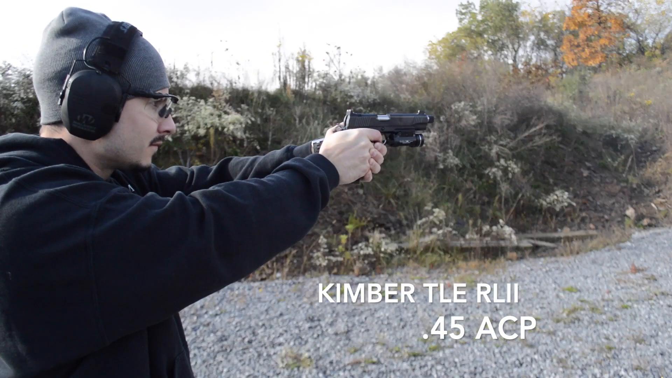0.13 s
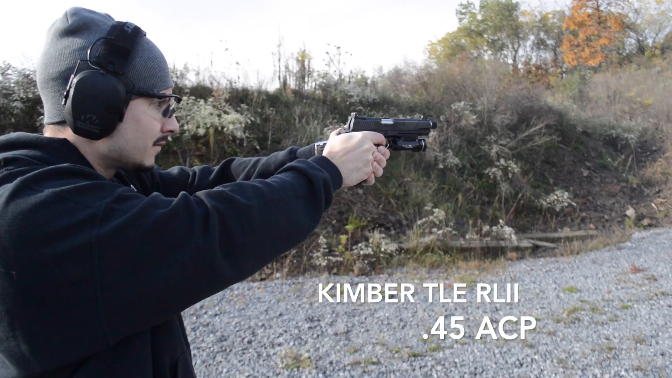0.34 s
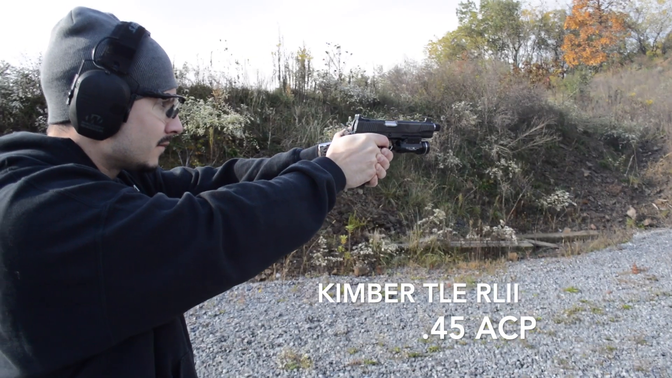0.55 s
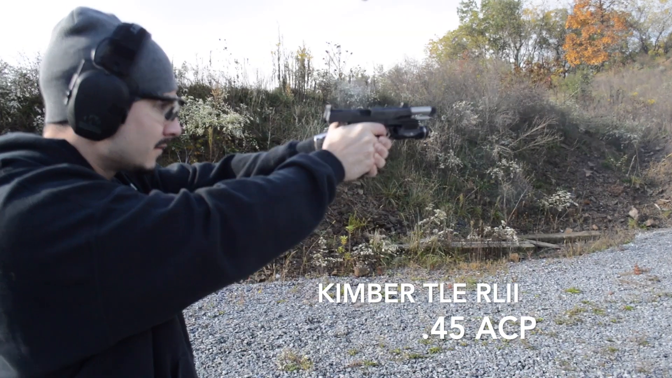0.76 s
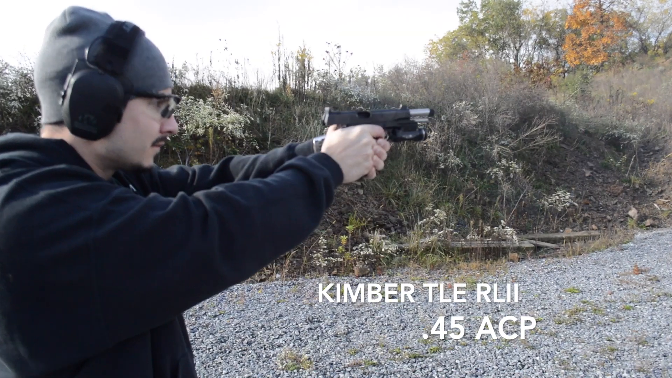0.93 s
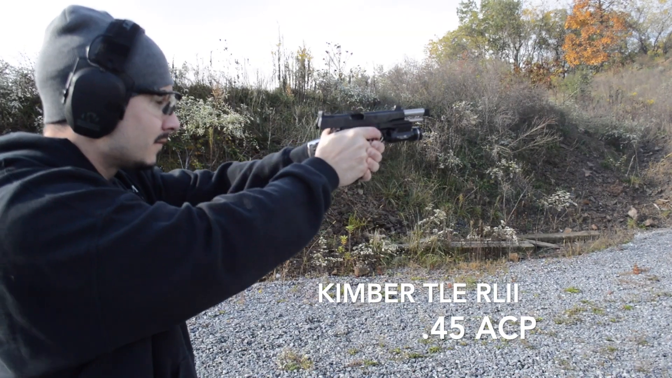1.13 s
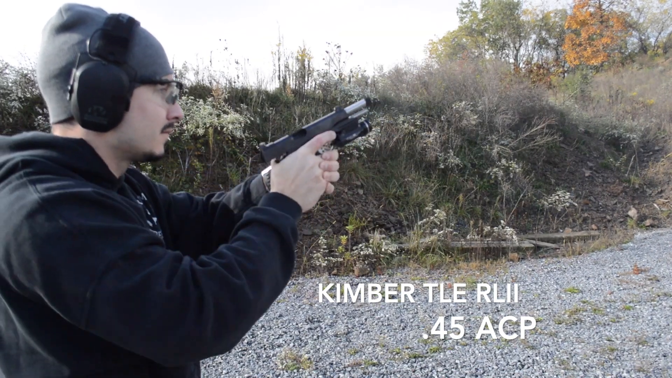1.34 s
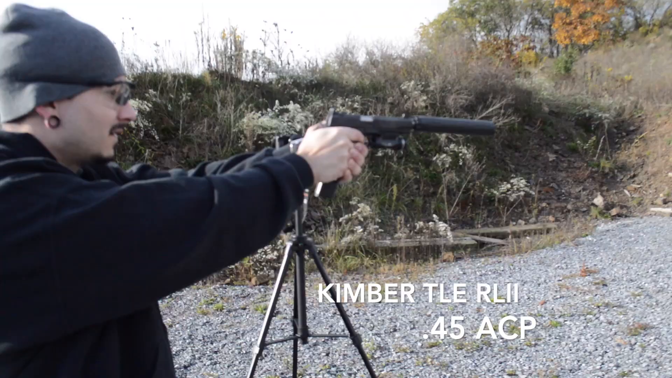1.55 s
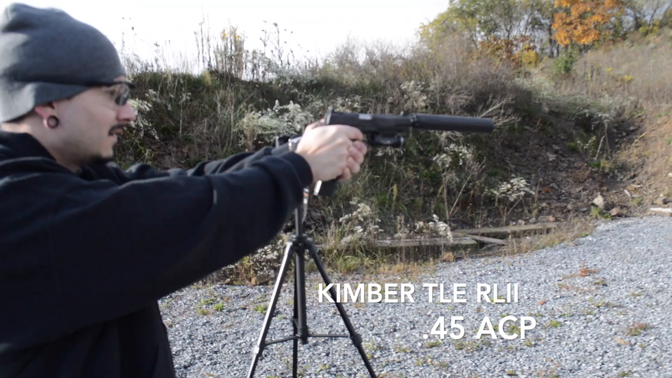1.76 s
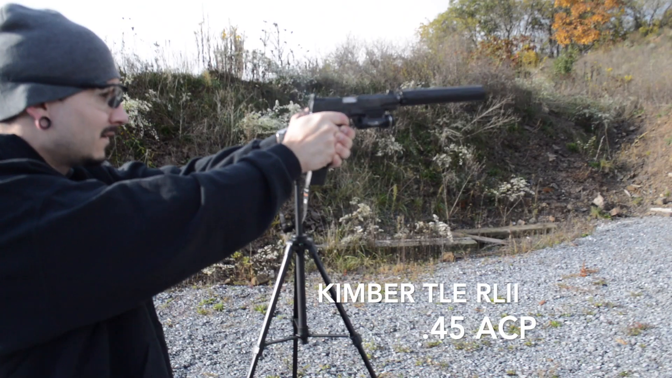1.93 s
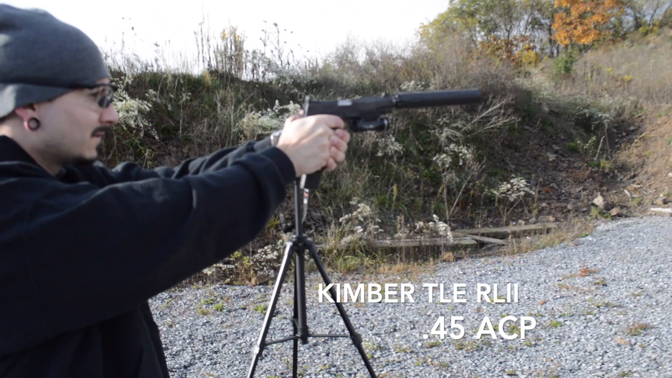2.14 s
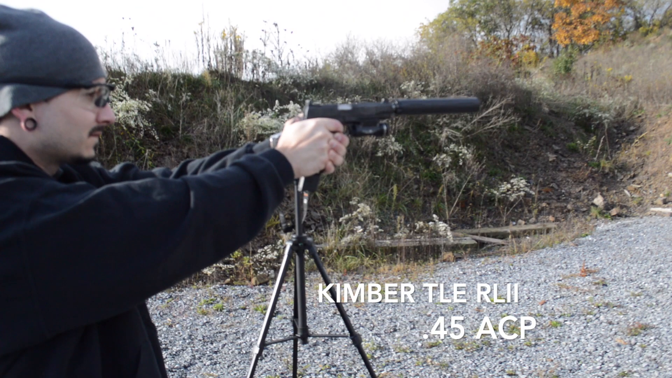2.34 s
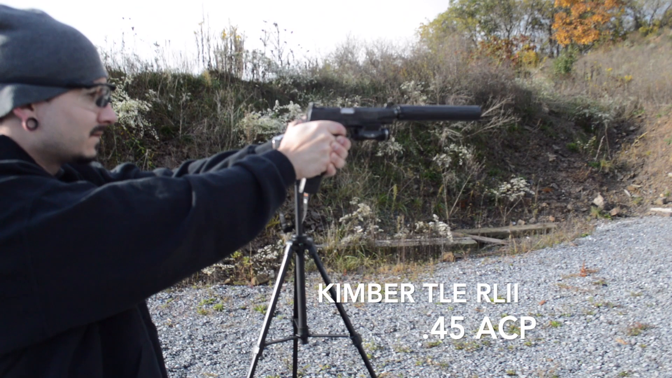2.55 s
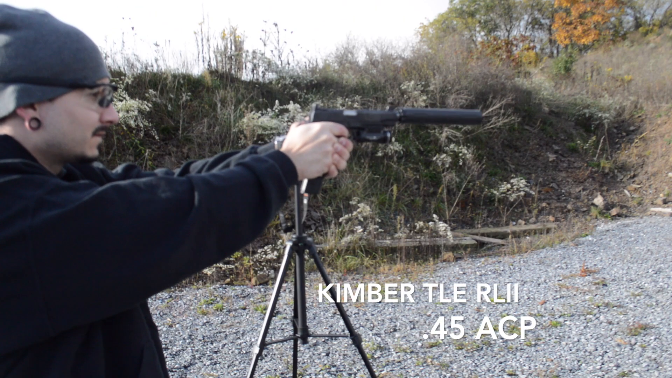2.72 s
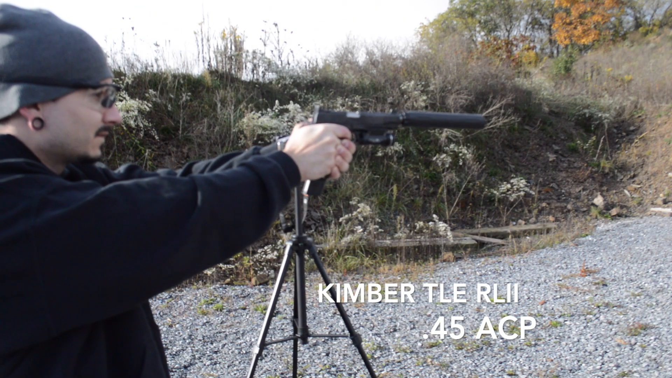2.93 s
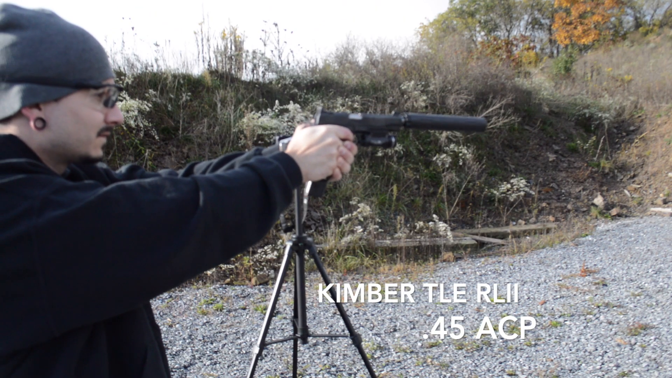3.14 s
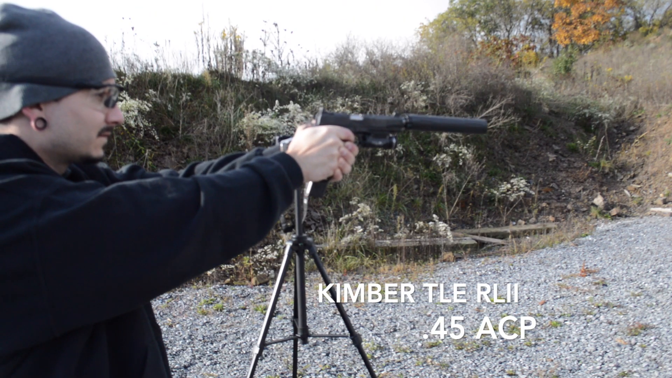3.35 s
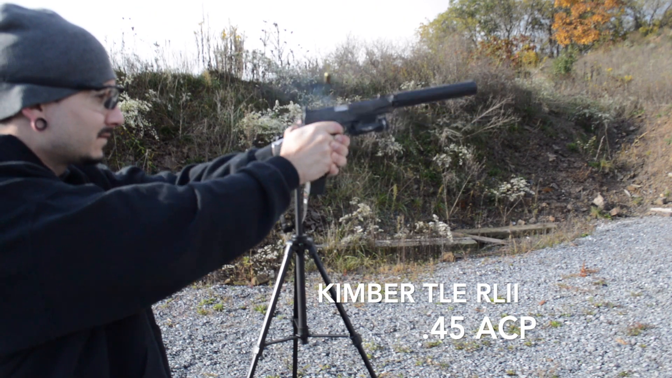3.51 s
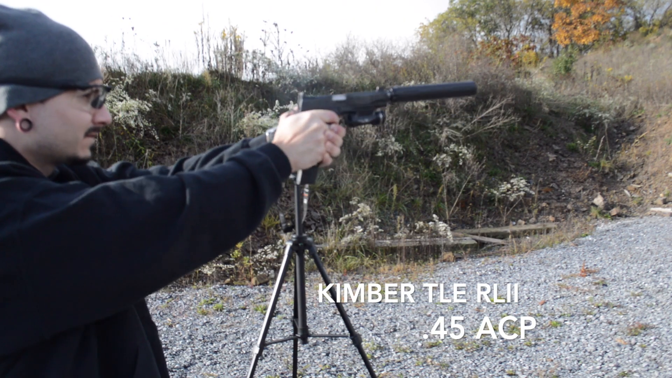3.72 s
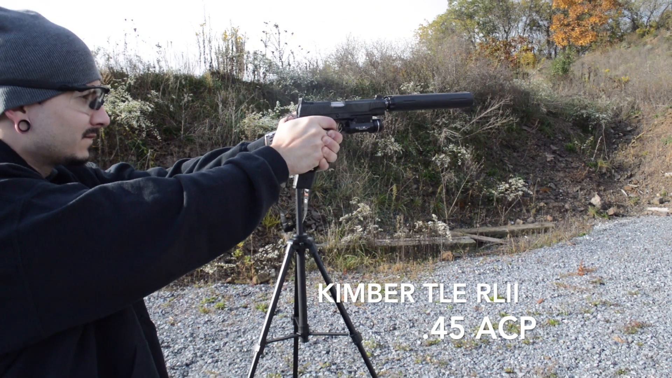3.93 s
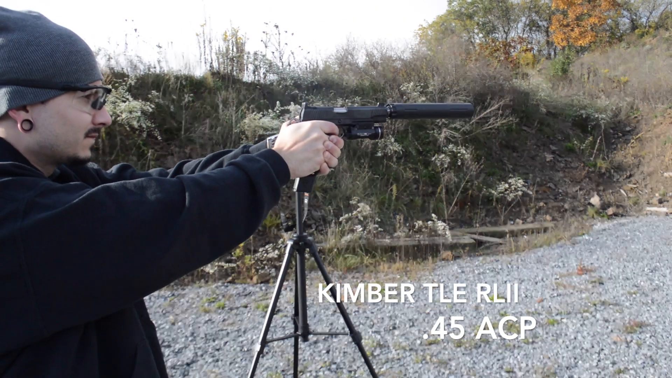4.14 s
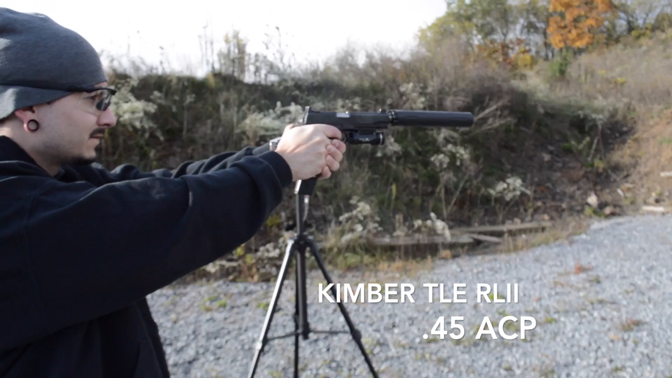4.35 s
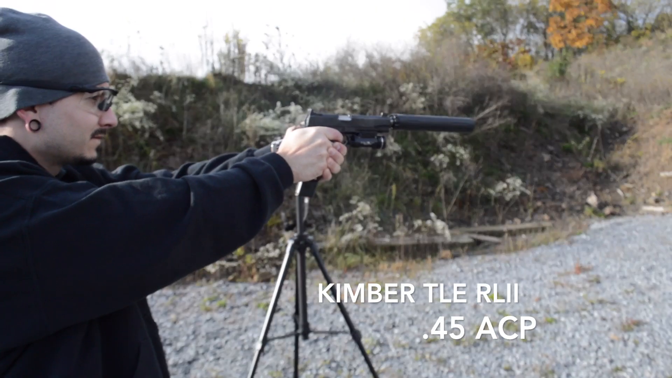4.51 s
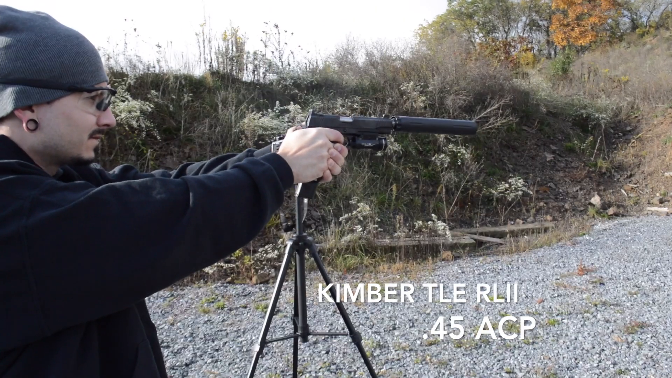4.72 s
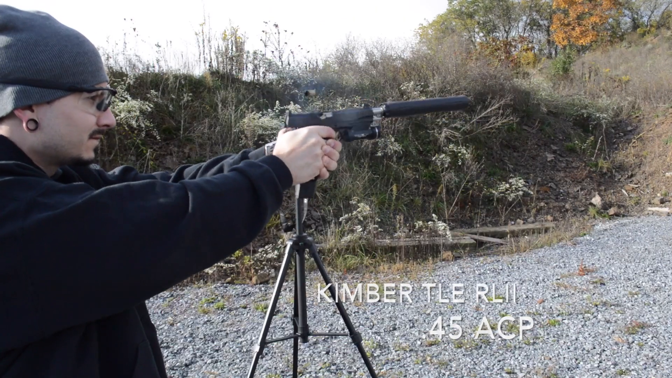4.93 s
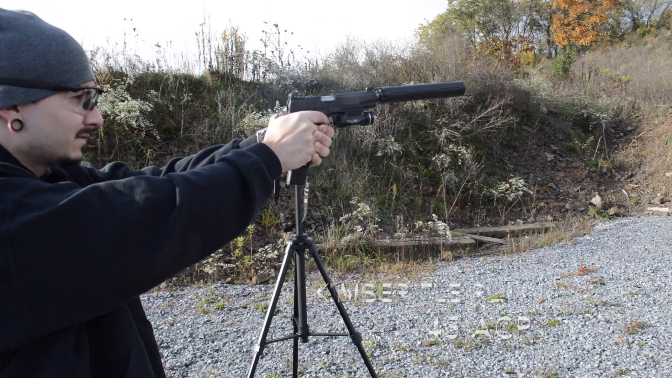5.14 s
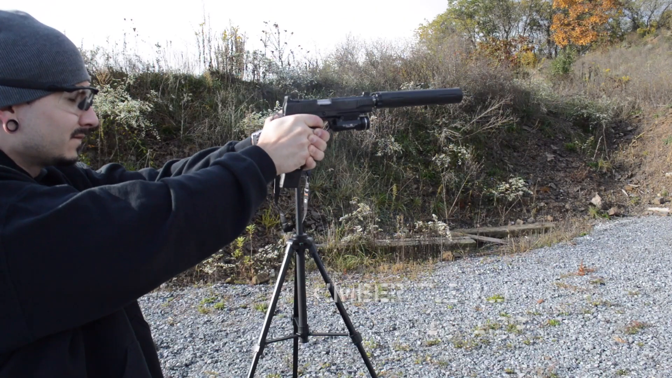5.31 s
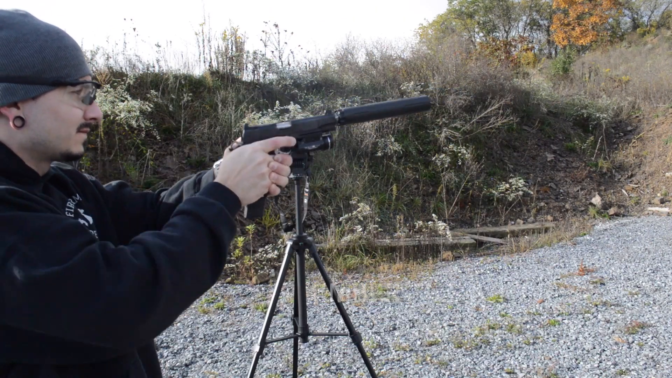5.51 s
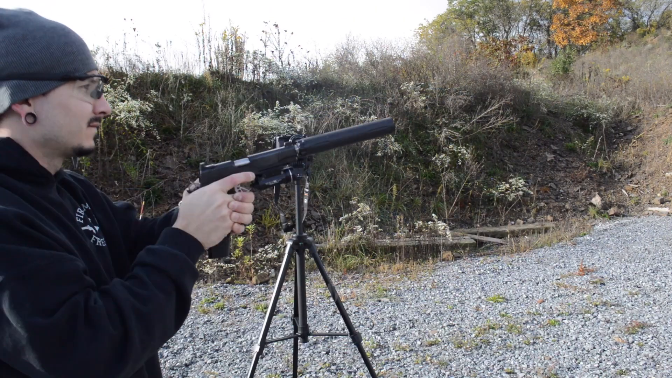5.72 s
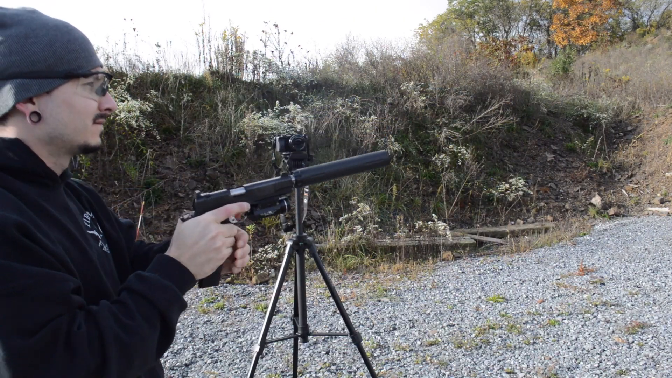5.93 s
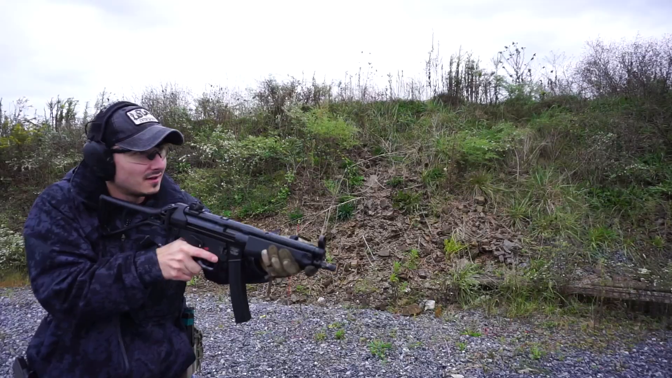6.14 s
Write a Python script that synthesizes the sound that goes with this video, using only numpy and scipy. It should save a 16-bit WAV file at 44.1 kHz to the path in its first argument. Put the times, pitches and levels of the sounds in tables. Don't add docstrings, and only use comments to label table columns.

```python
import sys
import numpy as np
from scipy import signal
from scipy.fft import rfft, irfft, next_fast_len
from scipy.io import wavfile
from scipy.ndimage import uniform_filter1d

SR = 44100
rng = np.random.default_rng(int(sys.argv[2]) if len(sys.argv) > 2 else 0)


def int16_out(signal):
    q = np.round(np.clip(np.atleast_2d(signal).T, -1, 1) * 32767)
    wavfile.write(sys.argv[1], SR, q.astype(np.int16))


def voltage_ratio(decibels):
    exponent = np.asarray(decibels, float) / 20
    return 10 ** exponent


N = 272097

LEAD_S = 0.005
SHOT_T = np.arange(SR) / SR - LEAD_S
GRIT_DB = 3


def colour(x, table):
    hz, db = np.transpose(table)
    f = np.log(np.fft.rfftfreq(len(x), 1 / SR) + 1)
    y = irfft(rfft(x) * voltage_ratio(np.interp(f, np.log(hz), db)), len(x))
    return y / np.sqrt(np.mean(y ** 2))


def bands(x, centres_hz):
    f = np.log(np.fft.rfftfreq(len(x), 1 / SR) + 1)
    centres = np.log(centres_hz)
    spectrum = rfft(x)
    return [irfft(spectrum * np.interp(f, centres, row), len(x)) for row in np.eye(len(centres))]


def add(out, start_s, x):
    i = int(round(start_s * SR))
    a, b = max(i, 0), min(i + len(x), N)
    out[a:b] += x[a - i:b - i]


def walk(rate_hz, size=N):
    hold = int(SR / rate_hz)
    steps = np.repeat(rng.standard_normal(size // hold + 1), hold)
    return 1.41 * uniform_filter1d(steps, hold)[:size]


def gas_blast(spectrum, level_db, hold_s, fall_s, hammer_db):
    hammer = voltage_ratio(hammer_db + 670 * np.minimum(SHOT_T, 0))
    burst = np.exp(-np.maximum(SHOT_T - hold_s, 0) / fall_s)
    gas = colour(rng.standard_normal(SR), spectrum)
    return voltage_ratio(level_db + GRIT_DB * walk(392, SR)) * gas * np.where(SHOT_T < 0, hammer, burst)


def bank_return(ground, banks, body_db, far_air, spectrum, bounce_s, bounce):
    coarse_s = np.arange(0, 1, .001)
    crest_s, level_db, rise, fall, bass_db = np.transpose(banks)[:, :, None]
    waves_db = level_db - np.maximum(rise * (crest_s - coarse_s), fall * (coarse_s - crest_s))
    near_db, far_db, fade_s = far_air
    treble_db = far_db + (near_db - far_db) * np.exp(-coarse_s / fade_s)

    alike = 0.49
    echo = alike * ground + np.sqrt(1 - alike ** 2) * rng.standard_normal(SR)
    skim = bounce * (SHOT_T > .36) * np.roll(echo, int(bounce_s * SR))
    echo = colour(echo + skim, spectrum)

    lumps_db = 4.5 * SHOT_T * walk(80.1, SR)
    out = np.zeros(SR)
    centres_hz = 150 * 2 ** np.arange(0, 7, .75)
    for hz, band in zip(centres_hz, bands(echo, centres_hz)):
        bass = (bass_db + body_db * (crest_s > .15)) * np.clip(np.log2(1800 / hz), 0, 1)
        waves = np.sqrt(np.sum(voltage_ratio(waves_db + bass) ** 2, axis=0))
        waves = waves * voltage_ratio(treble_db * max(hz - 3000, 0) / 8000)
        patchy_db = 1.85 * walk(89.12, SR) + 1.27 * walk(25.4, SR)
        level = voltage_ratio(3.5 + patchy_db + lumps_db * (hz < 1500))
        out += (SHOT_T > 0) * band * np.interp(SHOT_T, coarse_s, waves) * level
    return out


def knock(level_db, pitch_hz, cycles):
    u = np.arange(1024) * pitch_hz / cycles / SR
    noise = rng.standard_normal(1024)
    rattle = bands(noise, [pitch_hz / 3, pitch_hz, pitch_hz * 3])[1] * 0.78 * np.exp(-u / 3.4)
    swell = np.sin(np.pi * np.minimum(u, 1) ** 0.46) ** 2
    return voltage_ratio(level_db) * (swell * np.sin(2 * np.pi * cycles * u) + rattle)


def shots(times, blast, blast_db, fall_s, knocks, banks, far_air, echo_colour, bounce_s, bounce):
    out = np.zeros(N)
    ground = rng.standard_normal(SR)
    for start_s, level_db, body_db, hold_s, hammer_db in times:
        x = gas_blast(blast, blast_db, hold_s, fall_s, hammer_db)
        x += bank_return(ground, banks, body_db, far_air, echo_colour, bounce_s, bounce)
        for delay_s, peak_db, pitch_hz, cycles in knocks:
            i = int((delay_s + LEAD_S) * SR)
            x[i:i + 1024] += knock(peak_db, pitch_hz, cycles)
        add(out, start_s - LEAD_S, voltage_ratio(level_db) * x)
    return out


# start_s, level_db, return_bass_db, blast_hold_s, hammer_db (under the blast)
OPEN_SHOTS = [
    (-.281, -1.1, 1.7, .012, -20),
    (0.6808, 0, 0, 0.013, -18),
]
# pitch_hz, level_db (per Hz)
OPEN_BLAST = [(35, -32), (60, -8), (1080, 4), (2140, -5.5), (2460, 8.5), (2770, -5), (6300, 0.5),
              (15400, -5.5), (16500, -30.5)]
# delay_s, peak_db, pitch_hz, cycles
OPEN_KNOCKS = [
    (.001, -9.5, 165.5, 2.2),
    (.0537, 3, 814, 3.6),
    (.0545, 7, 2830, 1.4),
    (.065, -18, 6460, 5.5),
    (.205, -10, 650, 1.8),
    (.26, -4, 720, 3),
    (.442, -10, 494, 5.3),
    (.494, -15, 566, 8.7),
]
# crest_s (after the shot), level_db, rise_db_per_s, fall_db_per_s, extra_bass_db
OPEN_BANKS = [
    (.0, -20.5, 900, 122.5, -36.5),
    (0.063, -26, 252, 378, 9.5),
    (0.206, -31, 400, 67, -20),
    (0.258, -17.5, 151.5, 317, 1),
    (0.322, -26.5, 47, 652, 1.5),
    (.37, -40, 150, 67, -23.5),
    (0.418, -24, 752, 75.5, 3),
]
# at_once_db, far_away_db, fade_s
OPEN_AIR = (11.8, -23.5, 0.59)
# pitch_hz, level_db (per Hz)
OPEN_COLOUR = [(59, -51), (100, -13), (283, -20.5), (535, -2), (662, -5), (854, -5), (1310, -4.5),
               (1450, -8.5), (2130, -8), (6700, -13.5), (16000, -26.5)]


def open_shots():
    return shots(OPEN_SHOTS, OPEN_BLAST, -7.5, 0.005, OPEN_KNOCKS, OPEN_BANKS, OPEN_AIR, OPEN_COLOUR,
                 bounce_s=0.0019, bounce=0.013)


# start_s, level_db, return_bass_db, blast_hold_s, hammer_db (under the blast)
QUIET_SHOTS = [
    (1.82, 0.084, 0.5, 0.0052, -20.5),
    (3.4815, 0.086, -5, 0.0041, -16),
    (4.9327, 0.1, -4.5, 0.0062, -20),
]
# pitch_hz, level_db (per Hz)
QUIET_BLAST = [(35, -54), (60, -18), (342, 2), (2770, -10.5), (3180, -5.5), (7960, -0.5), (8960, -4.5),
               (15000, 0.5), (16500, -1)]
# delay_s, peak_db, pitch_hz, cycles
QUIET_KNOCKS = [
    (0.003, -21.5, 125, 0.56),
    (.046, 5, 1660, 1),
    (0.0454, 7.5, 4500, 1.6),
    (0.0536, -4.5, 1940, 1.5),
    (0.0534, -1, 7330, 3.2),
    (.2373, -6, 2340, 4.5),
    (.237, -16, 5480, 9.5),
    (.255, -24, 848, 12.5),
    (.4, -37, 1800, 5.2),
]
# crest_s (after the shot), level_db, rise_db_per_s, fall_db_per_s, extra_bass_db
QUIET_BANKS = [
    (.0, -32, 900, 71.4, -27),
    (0.064, -35.5, 900, 268, 9),
    (0.188, -45.5, 840, 33.8, -7),
    (0.258, -25.5, 158, 243, 0),
    (0.323, -35, 15, 850, -7.5),
    (.37, -88.5, 150, 50, -58),
    (0.413, -33.5, 460, 87.5, 6.5),
]
# at_once_db, far_away_db, fade_s
QUIET_AIR = (18.3, -12.5, 0.31)
# pitch_hz, level_db (per Hz)
QUIET_COLOUR = [(59, -66), (100, -50.5), (138, -6), (260, -18.5), (358, -14), (535, -7.5), (800, -10),
                (1050, -13.5), (1500, -6), (2420, -5), (4000, -7), (5600, -7.5), (6350, -7.5),
                (7200, -10.5), (8500, -12.5), (16000, -28.5)]


def suppressed_shots():
    return shots(QUIET_SHOTS, QUIET_BLAST, -0.69, .0062, QUIET_KNOCKS, QUIET_BANKS, QUIET_AIR, QUIET_COLOUR,
                 bounce_s=.00064, bounce=.38)


# start_s, level_5khz_db, level_2500hz_db, level_10khz_db,
# level_14khz_db
CONTACTS = [(0.0731, -14, -15, -16, -6), (0.0739, -9, -8, -20, -21), (0.0791, -17, -12, -30, -33),
            (0.0867, -13, -14, -6, -15), (0.3736, -16, -20, -13, -13), (0.3744, -18, -26, -25, -19),
            (0.5173, -14, -22, -4, -3), (0.5188, -20, -15, -18, -7), (1.1412, -17, -22, -17, -24),
            (1.1424, -14, -24, -21, -17), (1.2552, -36, -36, -27, -35), (1.2865, -20, -22, -21, -23),
            (1.2872, -23, -23, -25, -23), (1.5361, -18, -21, -13, -11), (1.5368, -14, -12, -15, -13),
            (1.5388, -15, -11, -17, -19), (1.5403, -13, -20, -5, -24),
            (2.5759, -16, -22, -17, -9), (2.5773, -24, -30, -26, -18), (2.634, -12, -19, -9, -24),
            (2.6348, -8, -19, -12, -13), (2.6356, -12, -21, -5, -9), (2.6521, -33, -45, -30, -25),
            (2.6534, -27, -45, -27, -23), (2.6548, -37, -48, -25, -32), (2.718, -19, -39, -23, -32),
            (2.7408, -33, -29, -27, -24), (2.8137, -23, -37, -18, -27), (2.8324, -14, -22, -12, -28),
            (2.8426, -25, -37, -19, -30), (3.2029, -25, -29, -44, -43), (3.2539, -41, -53, -33, -19),
            (3.8368, -31, -41, -27, -33), (3.8765, -33, -32, -28, -19), (4.2742, -13, -22, -16, -10),
            (4.2981, -12, -20, -13, -14), (4.2989, -17, -28, -18, -24), (4.2996, -22, -22, -26, -19),
            (4.3009, -22, -30, -13, -15), (4.3023, -14, -19, -13, -17), (4.3031, -20, -25, -18, -19),
            (4.5869, -5, -14, -21, -19), (4.6831, -39, -37, -21, -35), (4.7291, -18, -26, -25, -23),
            (4.7537, -15, -33, -17, -24), (4.8059, -22, -34, -39, -41), (5.3985, -16, -23, -12, -19),
            (5.3996, -13, -27, -21, -18), (5.4009, -16, -28, -32, -20), (5.4039, -21, -27, -36, -24),
            (5.7578, -16, -16, -10, -15), (5.7595, -10, -21, -3, -11), (5.7621, -8, -17, -6, -4),
            (2.6213, -37, -46, -37, -45), (2.6898, -46, -50, -32, -42), (2.6939, -34, -49, -32, -39),
        (2.7354, -32, -46, -28, -43), (2.7646, -40, -52, -32, -39), (2.7654, -36, -53, -46, -38),
        (2.7756, -30, -39, -29, -37), (2.7954, -30, -46, -32, -34), (2.9229, -45, -48, -37, -47),
        (2.9265, -36, -48, -37, -45), (2.9308, -32, -45, -33, -48), (2.9616, -48, -48, -44, -37),
        (3.0907, -50, -48, -37, -37), (3.2021, -29, -41, -43, -38), (3.3721, -41, -47, -36, -34),
        (4.1654, -38, -46, -45, -37), (4.3378, -31, -43, -29, -33), (4.342, -41, -49, -33, -37),
        (4.4107, -42, -49, -31, -35), (4.4285, -36, -40, -42, -41), (4.4448, -40, -50, -38, -41),
        (4.4542, -43, -47, -45, -38), (4.4743, -34, -47, -32, -32), (4.5214, -50, -40, -52, -52),
        (4.7875, -40, -41, -37, -35), (4.8132, -35, -38, -44, -41), (4.8302, -30, -41, -45, -37),
        (4.8446, -33, -42, -31, -41), (4.8632, -37, -51, -31, -37), (5.4955, -39, -43, -40, -37),
        (5.7962, -33, -43, -30, -28), (5.8099, -37, -46, -38, -32), (5.8478, -43, -54, -37, -44),
        (5.8839, -46, -53, -35, -47), (5.8929, -36, -53, -35, -42), (5.8959, -45, -49, -37, -45),
        (5.901, -43, -51, -35, -42), (5.9046, -39, -41, -37, -51), (5.935, -40, -38, -48, -44),
        (6.1171, -54, -37, -48, -50)]


def case_clicks():
    out, n = np.zeros(N), 512
    f = np.log(np.fft.rfftfreq(n, 1 / SR) + 30)
    points = np.log([200, 800, 1700, 3300, 4500, 6500, 9000, 11000, 13000])
    for start_s, mid, low, high, top in CONTACTS:
        ripple = rng.standard_normal(24)
        db = np.interp(f, points, [low - 14, low - 4, low, low, mid, mid, high, high, top])
        db += 17 + 1.5 * np.interp(np.arange(len(f)), np.linspace(0, len(f), len(ripple)), ripple)
        cepstrum = irfft(np.log(voltage_ratio(db)), n)
        cepstrum[1:n // 2] *= 2
        cepstrum[n // 2 + 1:] = 0
        add(out, start_s - .0001, irfft(np.exp(rfft(cepstrum)), n) * np.sign(ripple[0]))
    return out


# start_s, level_db, tilt_db (per octave)
SKIDS = [(.074, -13, -4), (0.086, -22, -4), (.374, -22, -2), (.518, -16, 2), (1.142, -20, 0),
         (1.287, -21, 4), (1.5385, -17.5, -3), (2.576, -18.5, 1.5), (2.636, -12, 4.5), (2.652, -39, 9),
         (2.718, -36, 4), (2.831, -24, 6.5), (3.203, -33.5, -3.5), (3.523, -16, 13), (4.275, -21, 1.5),
         (4.3, -22, -4), (4.586, -27, -2), (4.728, -32, -4), (4.753, -31, 3), (4.806, -35, 2),
         (4.975, -7, 10), (5.399, -12, 5), (5.76, -24, -3), (5.76, -14.5, 6)]


def skids():
    out, t = np.zeros(N), np.arange(2048) / SR
    for start_s, level_db, tilt_db in SKIDS:
        spectrum = [(400, -12.5 - 2.77 * tilt_db), (2500, -3.5 - 2.1 * tilt_db),
                    (6000, 3.5), (14000, -6.0 + tilt_db)]
        grit = colour(rng.standard_normal(len(t)), spectrum)
        add(out, start_s, voltage_ratio(level_db + GRIT_DB * walk(700, len(t))) * grit * np.exp(-t / 0.0047))
    return out


def rings(table, ring_time, start_rad):
    out = np.zeros(N)
    base_s, gain = ring_time
    for start_s, pitch_hz, level_db, beat_hz, length_s in table:
        t = np.arange(int(length_s * SR)) / SR
        lower = np.sin(2 * np.pi * (pitch_hz - beat_hz / 2) * t)
        upper = .78 * np.sin(2 * np.pi * (pitch_hz + beat_hz / 2) * t + start_rad)
        choke = np.clip((length_s - t) / 0.0013, 0, 1) * np.clip(t / .0003, 0, 1)
        t60_s = base_s + gain * length_s
        add(out, start_s, voltage_ratio(level_db - 60 * t / t60_s) * (lower + upper) * choke / 2)
    return out * voltage_ratio(.7 * walk(70))


LOW_A, LOW_B, LOW_C, LOW_D, LOW_E, LOW_F = 7930, 7903, 7957, 7838, 7862, 7833
UP_A, UP_B, UP_C, UP_D, UP_E, UP_F = 11950, 11970, 12060, 12040, 12100, 12140
# start_s, pitch_hz, level_db, beat_hz, stopped_after_s
LOW_RINGS = [(.073, LOW_A, -14, 5.0, .013), (.086, LOW_A, -11, 4.0, .045), (.517, LOW_B, -17, 1.5, .17),
             (1.536, LOW_C, -6, 17, .03), (2.635, LOW_D, -10, 7.0, .066), (2.741, LOW_D, -27, 30, .015),
             (2.832, LOW_D, -12, 12, .032), (4.298, LOW_E, -18, 62, .26), (4.587, LOW_E, -3, 11, .034),
             (4.728, LOW_E, -21, 20, .025), (4.755, LOW_E, -32, 12, .04), (4.845, LOW_E, -36, 1.5, .085)]
UPPER_RINGS = [(.074, UP_A, -19, 5.0, .022), (.096, UP_A, -37, 8.0, .07), (.517, UP_B, -16, 10, .008),
               (1.5395, 10980, -8, 30, .005), (1.544, 10980, -22, 22, .05), (5.402, 7500, -38, 8.0, .09),
               (1.542, UP_C, -24, 8.0, .048), (2.69, UP_D, -36, 20, .05), (2.742, UP_D, -34, 9.0, .08),
               (2.833, UP_D, -27, 12, .03), (3.253, 12610, -18, 14, .033), (4.307, UP_E, -18, 45, .13),
               (4.587, UP_E, -23, 14, .11), (4.588, 15710, -36, 25, .06), (4.845, UP_E, -39, 3.0, .07),
               (5.268, 10100, -34, 6.0, .09), (5.765, 11350, -31, 30, .1), (5.768, 14900, -27, 25, .055)]
# start_s, pitch_hz, level_db, turns_hz, stopped_after_s
SWELLS = [(.126, LOW_A, -19, 58, .055), (.178, LOW_A, -19, 22, .045), (.19, LOW_A, -23, 4.5, .17),
          (.385, LOW_A, -37, 28, .035), (.525, UP_B, -20, 28, .036), (.555, UP_B, -26, 10, .1),
          (1.567, LOW_C, -16, 36, .027), (2.638, UP_D, -22, 22, .06), (2.70, LOW_D, -23, 24, .041),
          (2.862, LOW_D, -43, 9.0, .07), (2.752, LOW_D, -20, 19, .052), (2.805, LOW_D, -28, 38, .026),
          (4.602, LOW_E, -22, 31, .066), (4.672, LOW_E, -24, 17, .056), (4.73, UP_E, -36, 4.0, .1),
          (4.808, LOW_E, -23, 25, .04), (5.768, LOW_F, -25, 24, .05), (5.77, UP_F, -24, 28, .04),
          (5.885, LOW_F, -50, 8.0, .1)]
# base_s, gain (s per s of flight)
LOW_T60, UPPER_T60, SWELL_T60 = (.15, .85), (.1, .9), (.4, .05)


def case_rings():
    struck = rings(LOW_RINGS, LOW_T60, 0) + rings(UPPER_RINGS, UPPER_T60, 0)
    return struck + rings(SWELLS, SWELL_T60, np.pi)


# start_s, length_s, from_hz, to_hz, level_db
CHIRPS = [
    (4.065, .13, 1830, 1470, -56),
    (4.17, .13, 1450, 1540, -59),
    (4.54, .08, 2350, 2650, -57),
    (4.61, .13, 1460, 1540, -55),
    (4.68, .08, 2450, 2250, -58),
    (5.54, .062, 3660, 3770, -44),
    (5.81, .07, 1560, 1400, -58),
    (5.88, .11, 1590, 1500, -59),
]


def bird():
    out, waver = np.zeros(N), walk(100)
    for start_s, length_s, from_hz, to_hz, level_db in CHIRPS:
        t = np.arange(int(length_s * SR)) / SR
        hz = to_hz + (from_hz - to_hz) * (1 - t / length_s) ** 1.7
        hz = hz * (1 + .003 * waver[int(start_s * SR):][:len(t)])
        edge = np.clip(np.minimum(t, length_s - t) / 0.025, 0, 1) ** 2
        add(out, start_s, voltage_ratio(level_db) * edge * np.sin(2 * np.pi * np.cumsum(hz) / SR))
    return out * voltage_ratio(1.5 * walk(27))


def motor():
    t = np.arange(N) / SR
    hum = voltage_ratio(-35 + .7 * walk(8)) * np.sin(2 * np.pi * 145.3 * t)
    whine = air([(15200, -60), (15700, 0), (16200, -60)], -60)
    return hum + whine


def air(spectrum, level_db, gust_db=0):
    centres_hz = np.array([30, 60, 120, 240, 500, 1500, 6000])
    noise = colour(rng.standard_normal(next_fast_len(N, True)), spectrum)
    out = np.zeros(N)
    for hz, band in zip(centres_hz, bands(noise, centres_hz)):
        unsteady_db = min(300 / hz, 2.5) * walk(9) + gust_db * (100 < hz < 300)
        out += band[:N] * voltage_ratio(unsteady_db)
    return voltage_ratio(level_db) * out


CUTS_S = (1.59, 6.012)
# pitch_hz, level_db (per Hz)
FIRST_AIR = [(12, -32), (25, -34), (56, 0), (100, -14), (200, -33.5), (450, -16), (1690, -30),
             (4410, -33.5), (6350, -37.5), (15200, -40.5), (16500, -65)]
SECOND_AIR = [(12, -47.5), (20, -8), (91, -4.5), (230, -13), (273, -26.5), (305, -19), (452, -24.5),
              (535, -25.5), (670, -29), (750, -28.5), (1050, -34.5), (1240, -35), (4410, -35), (15200, -36),
              (16500, -45)]
THIRD_AIR = [(12, -23), (20, 6.5), (212, -10.5), (297, -7), (382, -5.5), (416, -8.5), (599, -10.5),
             (1650, -19.5), (2730, -31.5), (15200, -41), (16500, -61)]
# time_s, level_db
GUST = [
    (1.6, -1.5),
    (2.0, -9),
    (3.3, -4),
    (3.7, 7.5),
    (4.1, 0),
    (4.5, -2.5),
    (5.3, 3.5),
    (6.0, -2),
]


def background():
    t = np.arange(N) / SR
    first, second = (np.clip((cut_s - t) / 0.0019, 0, 1) for cut_s in CUTS_S)
    gust_db = np.interp(t, *np.transpose(GUST))
    x = first * (air(FIRST_AIR, -38.5) + motor())
    x += (second - first) * air(SECOND_AIR, -39.5, gust_db)
    x += (1 - second) * air(THIRD_AIR, -43.5) + bird()
    duck_db = np.zeros(N)
    for table, depth_db, recover_s in [(OPEN_SHOTS, -22, 0.25), (QUIET_SHOTS, -14, 0.22)]:
        for start_s, *_ in table:
            duck_db += depth_db * (t > start_s) * np.exp(-((t - start_s) / recover_s) ** 2)
    return x * voltage_ratio(duck_db)


def width():
    last = np.arange(N) / SR > CUTS_S[1]
    return last * air([(60, -43.0)] + THIRD_AIR[2:], -52.5)


def scene():
    mono = open_shots() + suppressed_shots() + case_clicks() + skids() + case_rings() + background()
    side = width()
    return np.array([mono + side, mono - side])


def band_limit(x):
    return signal.sosfilt(signal.butter(12, 17070, fs=SR, output="sos"), x)


def record(dry):
    low_pass = signal.ellip(8, .2, 60, 15900, fs=SR, output="sos")
    cut = signal.sosfilt(low_pass, np.clip(dry, -1.3, 1.3))
    high_pass = signal.butter(1, 900, "highpass", fs=SR, output="sos")
    opposite = np.array([[1], [-1]])
    difference = voltage_ratio(-37) * walk(400) * opposite * signal.sosfilt(high_pass, cut)
    return band_limit(np.clip(cut + difference, -1, 1))


dry = scene()
out = record(dry)
int16_out(out)
```